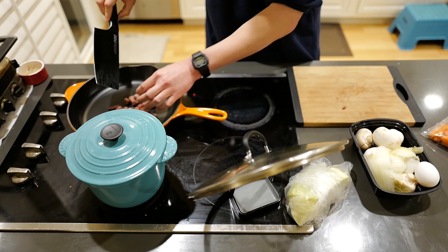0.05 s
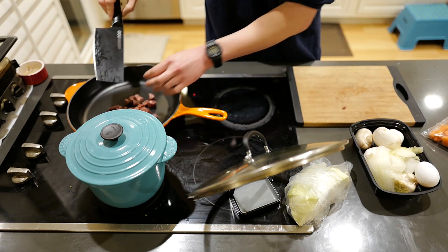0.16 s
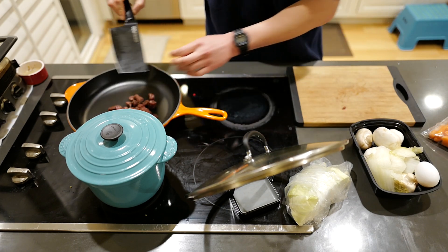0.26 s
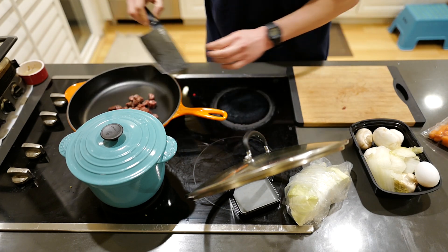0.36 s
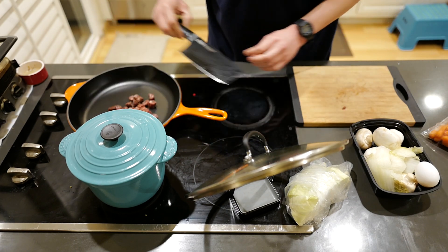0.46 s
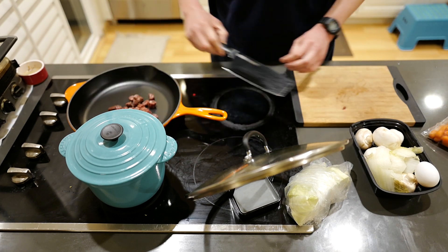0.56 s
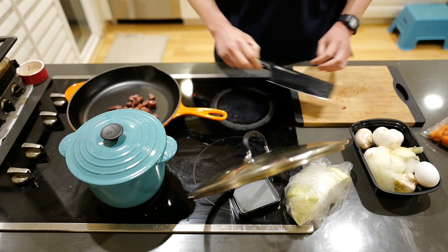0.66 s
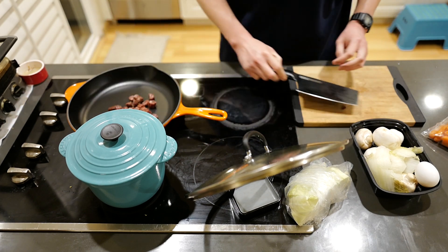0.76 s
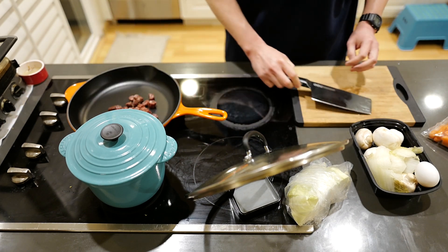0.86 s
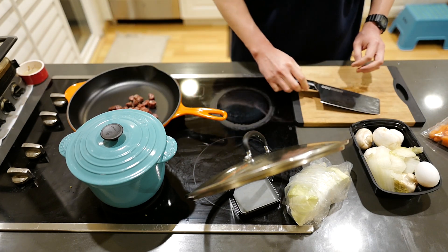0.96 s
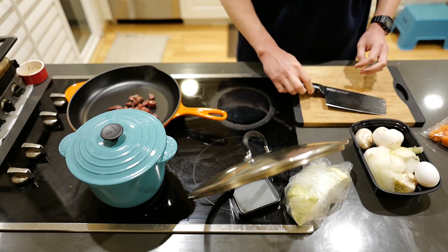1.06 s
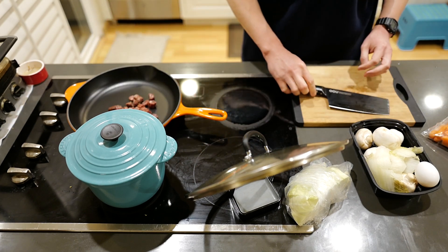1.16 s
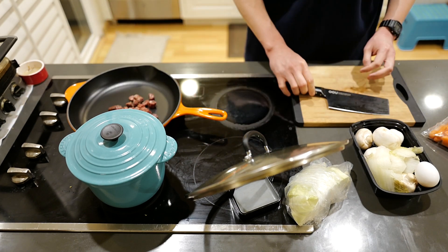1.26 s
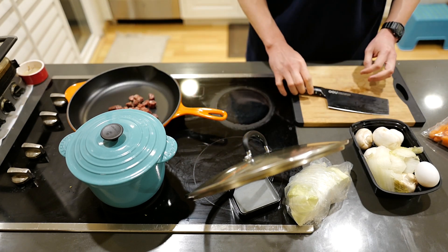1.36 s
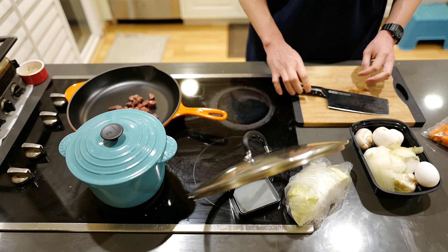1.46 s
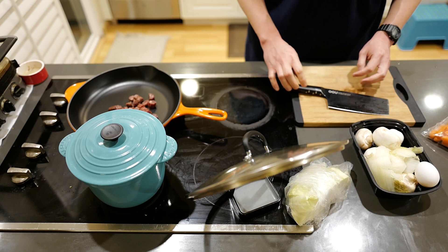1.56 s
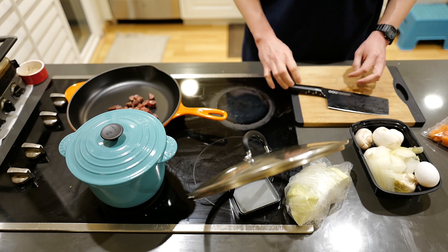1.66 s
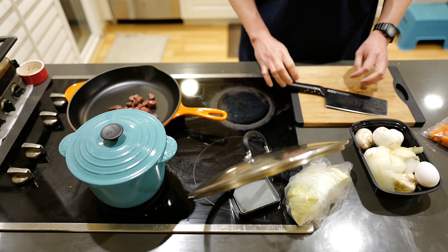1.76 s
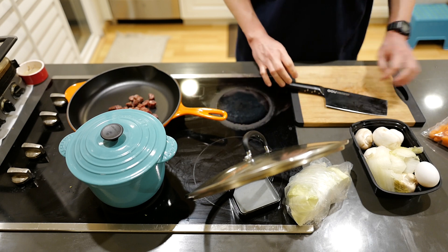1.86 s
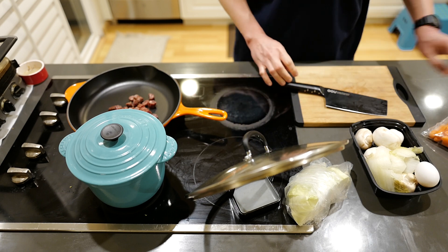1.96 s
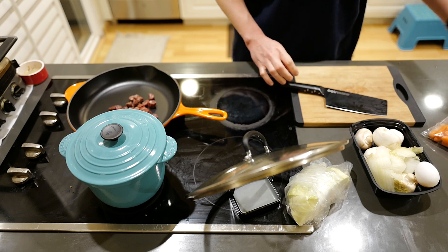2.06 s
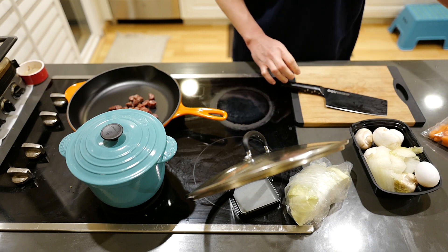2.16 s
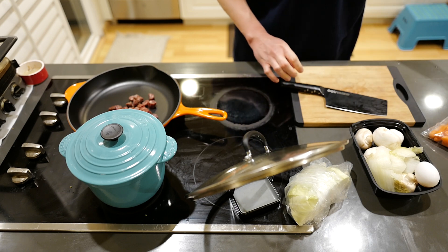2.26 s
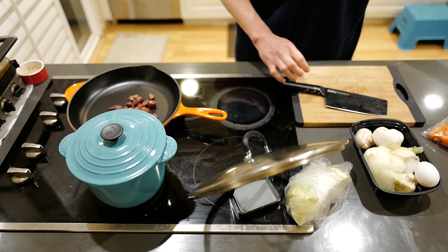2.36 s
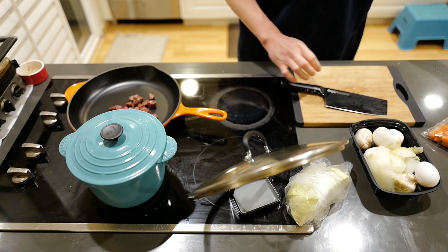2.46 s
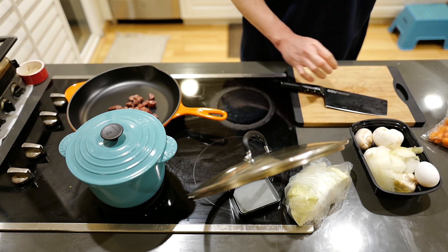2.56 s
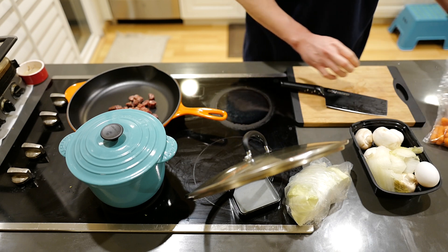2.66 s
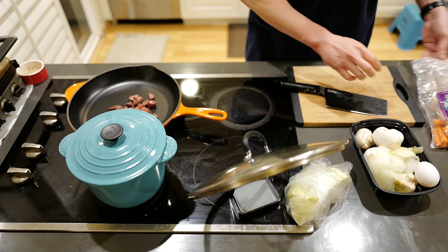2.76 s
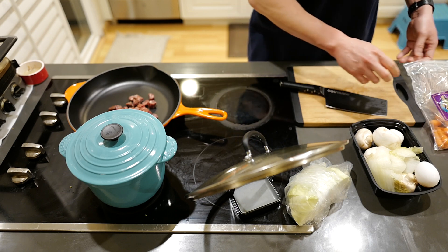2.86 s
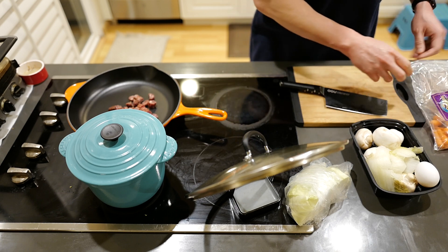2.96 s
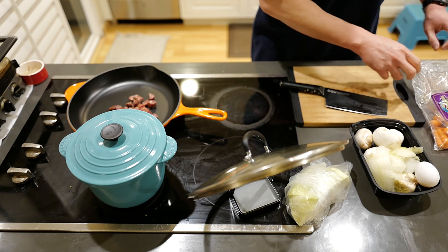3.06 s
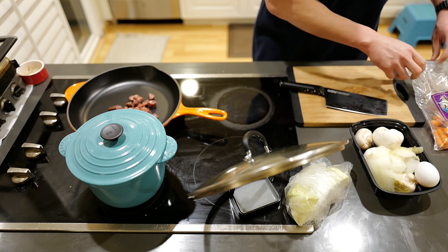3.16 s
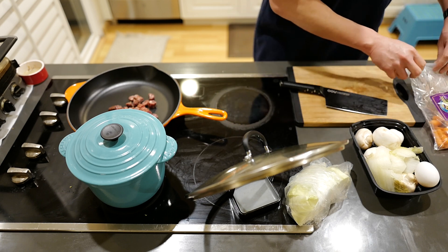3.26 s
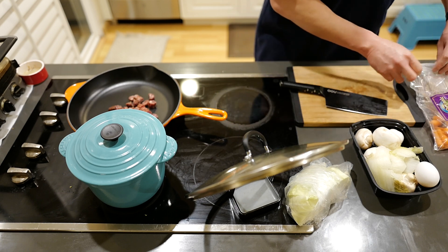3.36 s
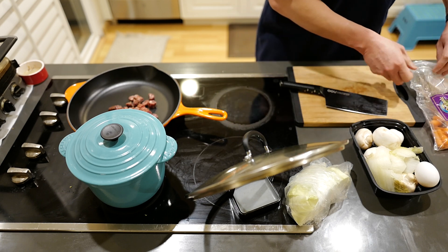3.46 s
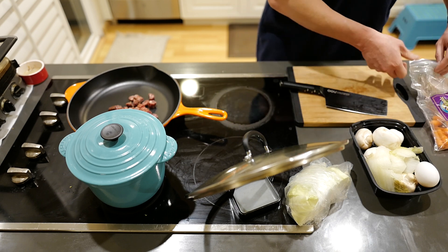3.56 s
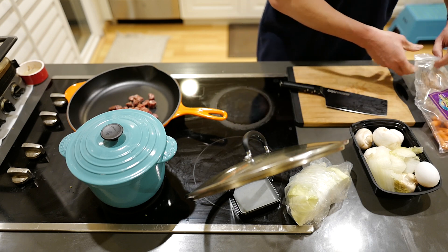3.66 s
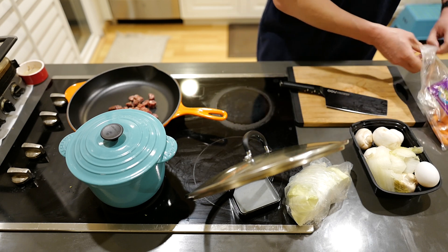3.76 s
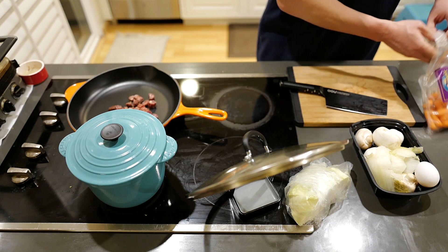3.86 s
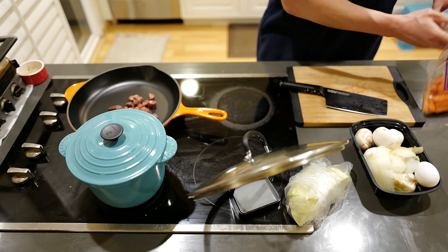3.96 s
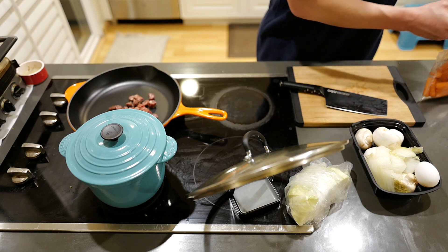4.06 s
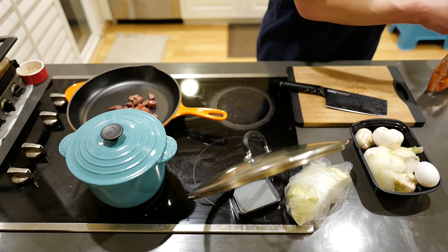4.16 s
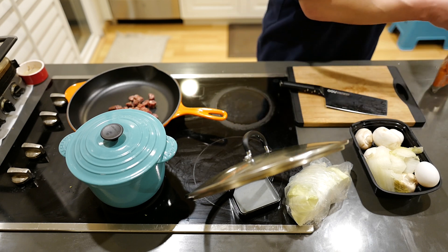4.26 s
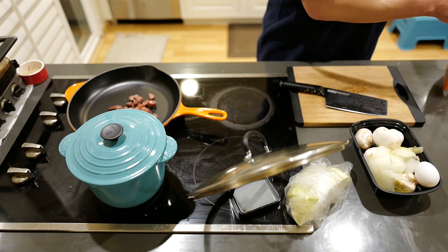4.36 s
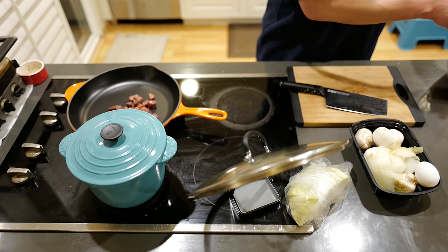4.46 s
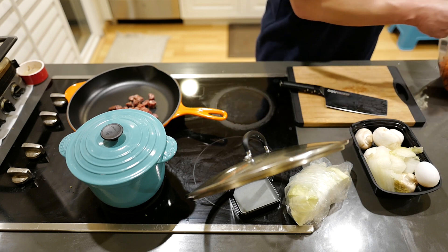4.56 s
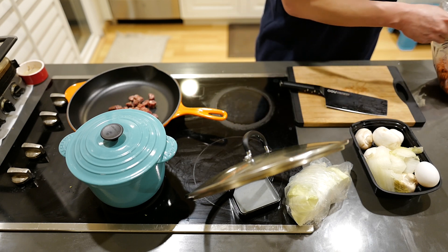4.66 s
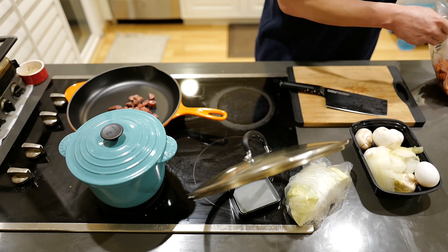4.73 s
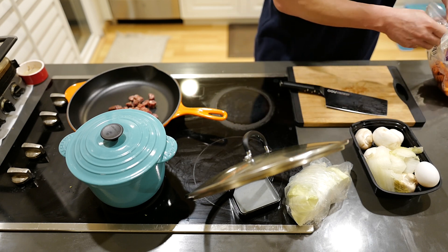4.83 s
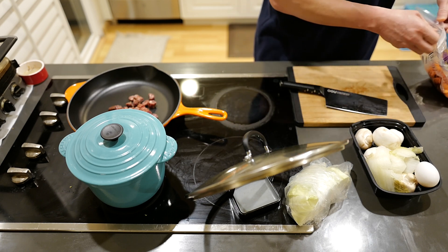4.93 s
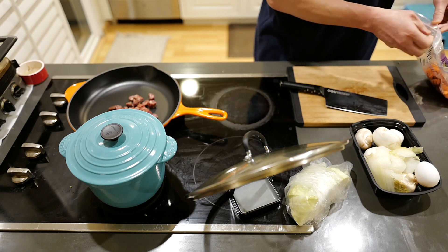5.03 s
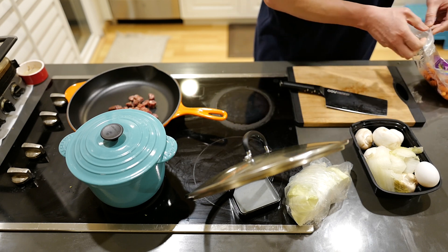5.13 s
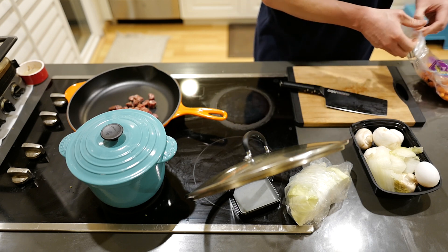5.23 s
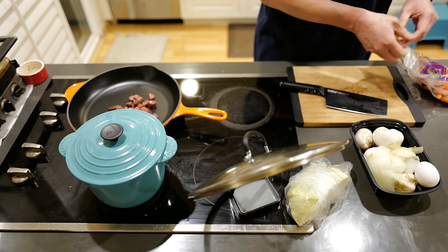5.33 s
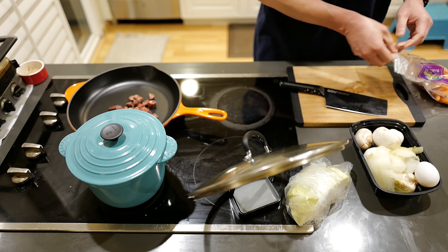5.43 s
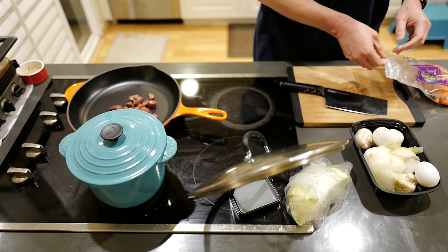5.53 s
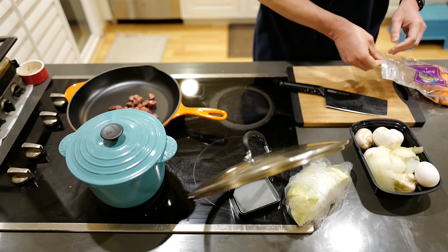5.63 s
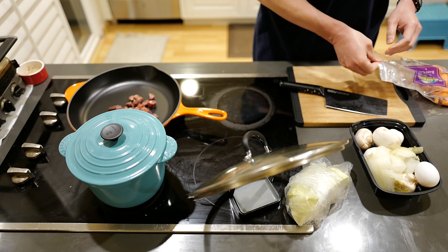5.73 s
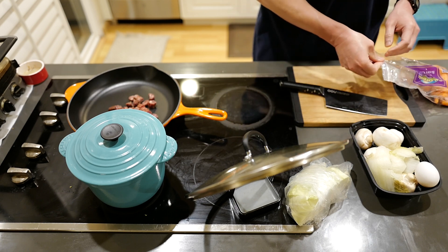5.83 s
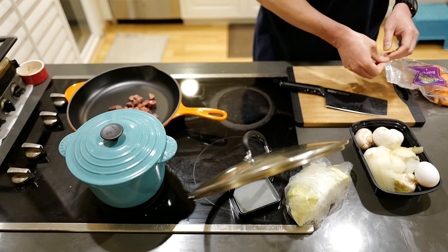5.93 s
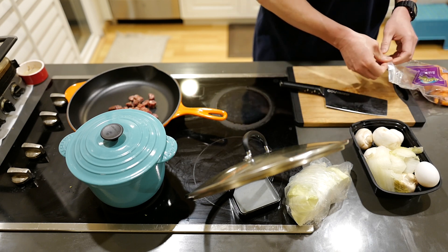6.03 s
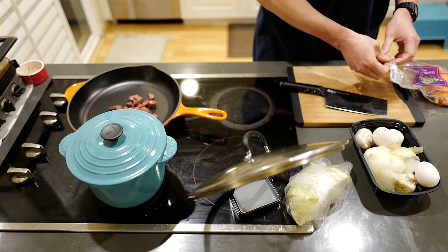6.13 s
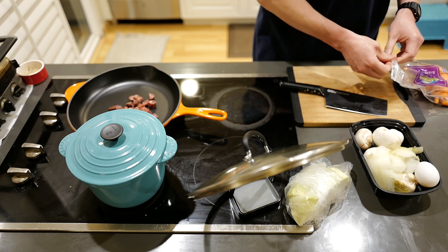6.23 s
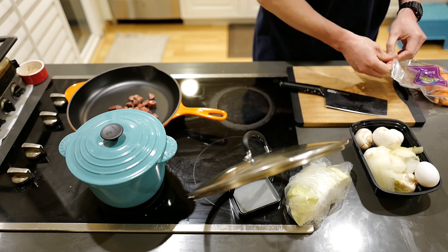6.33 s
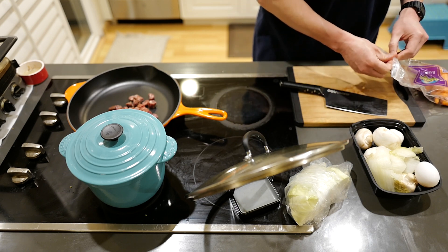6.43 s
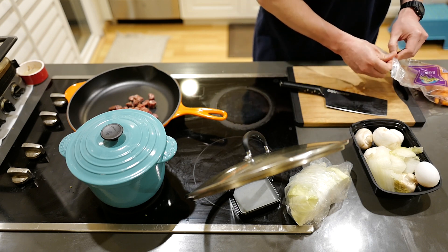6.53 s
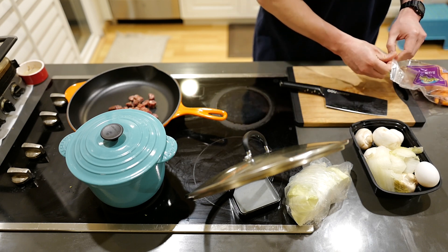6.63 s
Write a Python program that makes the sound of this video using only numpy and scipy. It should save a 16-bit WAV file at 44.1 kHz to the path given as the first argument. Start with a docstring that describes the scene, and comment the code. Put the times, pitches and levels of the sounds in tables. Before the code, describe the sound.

A soft brush of food and a tiny tick in a pan come first. A heavy cleaver lands on a cutting board, heel then flat, each clack leaving a brief steely ring, and is nudged along the wood. Then stiff plastic film snaps and rustles on the right while carrots bump dully. A soft ventilation hum runs throughout; the microphone is near, in a small lively kitchen.

```python
"""Cleaver, board and bag in a kitchen

A steel cleaver lightly touches an iron pan, then is set down on a wooden board: heel, then flat, then a nudge.
Its struck blade rings as decaying modes over knocks of coloured noise; the nudge is noise through resonances.
A plastic bag of carrots is handled: clicking film folds over a rustle of many small flips, with dull thumps.
A fan hums as wavering tones in air noise; tiled walls answer with decaying noise tails.
The microphone has a notch, a band limit and a mild gain control."""
import sys
import numpy as np
from scipy import signal
from scipy.fft import rfft, irfft, next_fast_len
from scipy.io import wavfile
from scipy.ndimage import uniform_filter1d, map_coordinates

SR = 44100
rng = np.random.default_rng(int(sys.argv[2]) if len(sys.argv) > 2 else 0)


def log_audio(samples):
    """Write samples as a 16-bit WAV file to the path given in sys.argv[1]."""
    # one column per channel
    frames = np.atleast_2d(samples).T
    # limit to full scale, then quantise
    limited = np.clip(frames, -1, 1)
    pcm = np.round(limited * 32767).astype(np.int16)
    wavfile.write(sys.argv[1], SR, pcm)


N = 295029  # length in samples


def amp(db):
    """Decibel law: level in dB to amplitude gain."""
    return 10 ** (np.asarray(db) / 20)


def unit(x):
    """Power normalisation: scaled to rms 1."""
    return x / np.sqrt(np.mean(x ** 2) + 1e-20)


def along(points, hz):
    """Logarithmic frequency scale: (f/Hz, value) points interpolated at hz."""
    f, value = np.transpose(points)
    return np.interp(np.log(hz + 1), np.log(f + 1), value)


def curves(rows):
    """Level envelopes: one value per sample for each dB column, -120 dB outside the table."""
    times, *columns = np.transpose(rows)
    return [np.interp(np.arange(N) / SR, times, column, -120, -120) for column in columns]


def wobble(rate):
    """Slow random modulation: a smooth curve through `rate` random knots a second."""
    knots = rng.standard_normal(int(N * rate / SR) + 4)
    return map_coordinates(knots, [np.arange(N) * rate / SR])


def filtered(x, response):
    """Linear filtering: the spectrum of x times a complex response of frequency."""
    m = next_fast_len(N + SR // 2)
    return irfft(rfft(x, m) * response(np.fft.rfftfreq(m, 1 / SR)), m)[..., :N]


def coloured(x, spectrum):
    """Minimum-phase filtering: causal colouring that keeps the power of white noise."""
    level_db = along(spectrum, np.fft.rfftfreq(2048, 1 / SR))
    cepstrum = irfft(np.log(amp(level_db) + 1e-6))
    cepstrum[1:1024] *= 2  # folding the cepstrum forward makes the filter causal
    cepstrum[1025:] = 0
    h = irfft(np.exp(rfft(cepstrum)))
    return signal.fftconvolve(x, h / np.linalg.norm(h))[:len(x)]


def spread(pair, alike):
    """Interchannel coherence: two unrelated signals mixed to left and right with the given likeness."""
    def weights(hz):
        turn = np.arccos(np.clip(along(alike, hz), -1, 1)) / 2
        return np.array([np.cos(turn), np.sin(turn)])
    mid, side = filtered(pair, weights)
    return np.array([mid + side, mid - side])


# fan and room air spectrum: f/Hz, relative level/dB per Hz
AIR_SPECTRUM = [(20, -39.5), (60, -38.5), (90, -37), (130, -23), (270, -18), (330, -19.5), (420, -20.5),
                (650, -28.5), (1150, -25.5), (1400, -30), (2000, -32.5), (2500, -35.5), (4700, -41),
                (5300, -37), (9800, -39.5), (16000, -47.5)]
# course of the air noise: t/s, level/dB
AIR_COURSE = [(0, -59), (.4, -56), (1.5, -58), (3.2, -57), (6.69, -57)]
# left-right likeness of the air noise: f/Hz, likeness (1 = identical)
AIR_LIKENESS = [(60, 0.62), (130, 0.84), (290, 1), (640, 0.27), (1410, 0.08), (3100, 0.12), (6820, 0.36),
                (15000, 0.73)]


def air_noise():
    """Broadband flow noise: stereo coloured noise whose level drifts slightly."""
    air = filtered(rng.standard_normal((2, N)), lambda hz: amp(along(AIR_SPECTRUM, hz)))
    level_db = curves(AIR_COURSE)[0] + 0.47 * wobble(16)
    return amp(level_db) * unit(spread(air, AIR_LIKENESS))


# tones of the turning fan: shaft order (multiple of the shaft rate), mean level/dB
FAN_ORDERS = [(10, -66), (11, -54), (12, -66), (13, -66), (37, -78), (40, -75)]
SHAFT_HZ = 29.68  # mean rate; it wavers slightly
# a thin whine at constant pitch: f/Hz, relative level/dB
THIN_WHINE = (1562, -78)


def fan():
    """Rotational tones: shaft orders and a thin whine, each wavering in strength, over air noise."""
    turns = np.cumsum(SHAFT_HZ * (1 + .002 * wobble(5.5))) / SR
    tones = 0
    for order, db in FAN_ORDERS:
        strength = amp(db + 3 + 2.2 * wobble(14))  # 3 dB from rms to peak
        tones = tones + strength * np.sin(2 * np.pi * (order * turns + rng.random()))
    whine_hz, whine_db = THIN_WHINE
    whine = amp(whine_db + 4 + 2.0 * wobble(2.7)) * np.sin(2 * np.pi * whine_hz * np.arange(N) / SR)
    return tones + whine + air_noise()


# reverberation time of the late field: f/Hz, t60/s
WALL_DECAY = [(200, 0.49), (1000, 0.49), (3000, 0.36), (8000, 0.26), (15000, 0.24)]
# left-right likeness of the reverberation: f/Hz, likeness
WALL_LIKENESS = [(100, 1), (600, 0.94), (3000, 0.7), (8000, .7), (15000, 0.24)]


def kitchen(x):
    """Diffuse reverberation: four noise tails with frequency-dependent decay take turns, 1/8 s of input each."""
    out = np.zeros((2, N))
    turn = np.arange(N) // (SR // 8) % 4
    for k in range(4):
        hz, t, z = signal.stft(rng.standard_normal((2, SR // 2)), SR, nperseg=128)
        late = amp(-60 * t / along(WALL_DECAY, hz)[:, None])
        early = amp(1.5 - 60 * t / 0.035)
        tail = signal.istft(z * (late + early), SR, nperseg=128)[1]
        tail /= np.linalg.norm(tail[0])
        out += signal.fftconvolve((x * (turn == k))[None], tail, axes=1)[:, :N]
    delayed = np.pad(out, ((0, 0), (60, 0)))[:, :N]  # 60 samples of travel
    return spread(delayed, WALL_LIKENESS)


# the blade touches the iron pan: t/s, relative level/dB
PAN_TOUCH = (0.295, -52.5)
# modes of the pan: f/Hz, relative level/dB, t60/s
PAN_MODES = [(1080, 4.5, 0.032), (2060, -7, .1), (2900, -11, .06), (5070, -5, 0.098), (6700, -6, .04)]
# soft rustle of moving hands: t/s, level/dB
HAND_RUSTLE = [(0, -54.5), (.08, -76), (.2, -75), (.28, -60), (.4, -80), (.8, -72.5), (.9, -78)]


def pan():
    """Modal decay and friction noise: a light tick on iron and a soft rustle of moving hands."""
    touch_s, touch_db = PAN_TOUCH
    t = np.maximum(np.arange(N) / SR - touch_s, 0)
    tick = sum(amp(touch_db + db - 60 * t / t60) * np.sin(2 * np.pi * hz * t) for hz, db, t60 in PAN_MODES)
    sweep = amp(curves(HAND_RUSTLE)[0] + wobble(30)) * rng.standard_normal(N)
    # f/Hz, relative level/dB per Hz
    colour = [(100, -27), (250, -1), (700, 4.5), (1200, -12.5), (2100, -11), (3500, -31.0), (8000, -49.0)]
    return tick + coloured(sweep, colour)


# bag snaps: t/s, level/dB, low part/dB and high part/dB against it, pitch of the fold f/Hz
BAG_SNAPS = [(2.1019, -29.5, -27, -27.5, 2840), (2.115, -29, -22, -15.5, 2800),
             (2.1571, -40, -13.5, -7, 2200), (2.1948, -31, -18, -30, 2400), (2.3943, -40.5, -8, -19, 2380),
             (2.4305, -33, -9.5, -14, 4440), (2.4989, -16, -12.5, -11, 5090),
             (2.6305, -26.5, -9.5, -12.5, 4240), (2.6419, -26, -12.5, -23, 2980),
             (2.6585, -16.5, -20, -23, 3010), (2.6647, -23, -14, -11.5, 2900),
             (2.6796, -19, -21, -5.5, 5740), (2.6902, -24, -9, -16.5, 4500),
             (2.8066, -27, -14, -15.5, 2400), (2.8649, -31, -3, -19, 2334), (2.9088, -27, -11.5, -25, 2310),
             (2.9774, -45.5, 5.5, -24, 1780), (3.2836, -33, -12, -22, 3040),
             (3.3177, -18, -16.5, -17, 2350), (3.369, -20, -13, -6, 1844), (3.482, -21.5, -17, -14, 1590),
             (3.5005, -27.5, -15, -8, 5800), (3.598, -34.5, 0.5, -41, 1740), (3.6828, -23, -18, -17, 4920),
             (3.7177, -22.5, -24, -18, 3600), (3.7409, -25, -9.5, -23, 1930),
             (3.7716, -16.5, -13, -12.5, 2360), (3.7859, -23, -24, -8, 1790),
             (3.8242, -19.5, -10.5, -8, 3900), (3.8496, -18, -29, -13.5, 3910),
             (3.8945, -27, -12, -9, 1800), (3.9307, -10.5, -12.5, -14.5, 2010),
             (3.9688, -17, -18, -11.5, 3080), (4.0232, -16, -17.5, -20, 2940), (4.092, -34, -25, -32, 1870),
             (4.1497, -16.5, -32, -15.5, 5030), (4.1778, -13.5, -19.5, -10.5, 2730),
             (4.2987, -21.5, -20, -12.5, 5800), (4.3311, -17.5, -23.5, -15, 4730),
             (4.3944, -17.5, -18, -9, 5270), (4.4395, -19, -31, -15.5, 3200),
             (4.4621, -22.5, -23, -9, 1860), (4.5104, -21.5, -18, -12.5, 2000),
             (4.558, -16.5, -19.5, -13.5, 3100), (4.591, -20.5, -9.5, -9, 2540),
             (4.6038, -14.5, -30, -17.5, 3170), (4.6713, -18.5, -18, -12, 2840),
             (4.7112, -26.5, -12, -10.5, 5390), (4.8188, -29.5, -6, -45, 1660),
             (4.8688, -21.5, -31, -11, 5620), (4.8776, -17, -24, -21, 3130), (4.9114, -20, -18, -15, 3840),
             (5.0982, -28, -17, -20.5, 2390), (5.157, -27, -24, -22, 3020), (5.2717, -27, -19, -16, 1800),
             (5.3172, -22, -17.5, -10.5, 5000), (5.3382, -23.5, -18, -9.5, 3950),
             (5.3528, -24, -16, -12, 4470), (5.3918, -22, -20, -16, 3520), (5.4145, -22, -22, -10, 5970),
             (5.5186, -23, -17, -16, 3800), (5.5303, -16, -18.5, -16, 3470), (5.6526, -32, -8.5, -44, 1860),
             (5.8575, -26.5, -17, -6, 1750), (5.994, -30, -8, -14.5, 3110),
             (6.0068, -28.5, -16, -6.5, 4530), (6.0502, -25.5, -13.5, -24.5, 1770),
             (6.0832, -29.5, -12, -24.5, 1750), (6.103, -27.5, -25, -12, 1680),
             (6.1623, -31.5, -17, -34, 3800), (6.2422, -29.5, -18, -14.5, 4660),
             (6.2739, -32, -16, -17.5, 4330), (6.312, -25, -16, -15.5, 1810),
             (6.4854, -39.5, -14, -24, 1990)]
# energy of a snap over its peak, for low, middle and high folds: level/dB
SNAP_ENERGY = [
    [16],
    [4],
    [14],
]
# ring of a fold against its noise, before scaling; its decay; its share in the room
POP_DB, POP_T60_S, POP_AROUND = -11, 0.015, 0.55


def film_snaps():
    """Snap-through buckling: folds flip with a click and a brief ring. Gives near sound and all-round sound."""
    near, around = np.zeros((3, N + SR)), np.zeros((3, N + SR))
    t = np.arange(400) / SR
    for s, db, low_db, high_db, hz in BAG_SNAPS:
        start = round(s * SR)
        burst = amp(-60 * t / np.array([[.012], [.006], [.004]])) * rng.standard_normal((3, len(t)))
        burst[:, 0] = 7.7  # the fold lets go at once
        pop = amp(POP_DB - 60 * t / POP_T60_S) * np.sin(2 * np.pi * hz * t)  # the panel beside the fold
        burst[1] += pop
        size = amp(db + np.array([[low_db], [0], [high_db]]) + SNAP_ENERGY)
        near[:, start:][:, :len(t)] += size * burst / np.linalg.norm(burst, axis=1, keepdims=True)
        around[1, start:][:len(t)] += size[1] * POP_AROUND * pop / np.linalg.norm(pop)
        around[:, start] += size[:, 0]  # over all directions the colour of a snap mostly evens out
    return near, around


# crackle left by a snap, under its energy, for low, middle and high folds: level/dB
SETTLE_LEVEL = [
    [-28.5],
    [-33],
    [-30],
]
# how fast that crackle dies: t60/s
SETTLE_DECAY = [
    [0.14],
    [0.19],
    [0.17],
]
RUSTLE_LOW_DB, RUSTLE_HIGH_DB = -3.5, -8.5  # low and high folds against the middle ones


def rustle(handling_db, around):
    """Crackling noise: countless small flips follow the handling and the settling after each snap."""
    t = np.arange(SR // 2) / SR
    decay = amp(np.array(SETTLE_LEVEL) - 60 * t / SETTLE_DECAY) ** 2
    settling = np.abs(signal.oaconvolve(around ** 2, decay, axes=1)[:, :N])
    worked = amp(handling_db + np.array([[RUSTLE_LOW_DB], [0], [RUSTLE_HIGH_DB]]))
    sizes = np.minimum(rng.exponential(size=N), 3)  # few large ones
    flips = (rng.random(N) < .012) * amp(5.5 * sizes + 3 * wobble(40))
    flips = signal.lfilter([1], [1, -.9], flips)
    flips /= np.sqrt(np.abs(uniform_filter1d(flips ** 2, size=2600)) + 1e-9)  # the hand sets the longer pace
    grains = np.array([unit(flips * rng.standard_normal(N)) for _ in range(3)])
    return np.sqrt(worked ** 2 + settling) * grains


# carrots drop in the bag: t/s, relative level/dB
CARROT_BUMPS = [(2.409, -51.5), (2.659, -46.5), (2.862, -44), (3.322, -58.5), (3.749, -46.5), (3.92, -44),
                (3.981, -52.5), (4.048, -48.5), (4.164, -46), (4.342, -59), (4.563, -41.5)]
BUMP_RISE_S, BUMP_T60_S = .015, 0.75
BUMP_UNDER_DB, ROLL_DB = -7.5, -14.5  # bumps against their table; steady rolling against the handling


def carrots(handling_db):
    """Damped impact noise: low coloured noise swells and dies at each bump, over steady rolling."""
    t = np.arange(SR // 2) / SR
    lumps = np.pad(amp(handling_db + ROLL_DB), (0, SR))
    for s, db in CARROT_BUMPS:
        bump = amp(db + BUMP_UNDER_DB - 60 * t / BUMP_T60_S) * (1 - np.exp(-t / BUMP_RISE_S))
        lumps[round(s * SR):][:len(t)] += bump
    lumps = lumps[:N] * amp(1.8 * wobble(30)) * rng.standard_normal(N)
    # f/Hz, relative level/dB per Hz
    return coloured(lumps, [(60, -74.0), (150, -4.5), (220, 5), (350, 0.0), (700, -21.0)])


# how hard the hands work the bag: t/s, level/dB
BAG_HANDLING = [(2.07, -96), (2.12, -60), (2.33, -94.5), (2.44, -54.5), (2.6, -60), (2.67, -43.5),
                (2.78, -52), (2.93, -67.5), (3.2, -93.5), (3.3, -48), (3.34, -48), (3.45, -76), (3.62, -60),
                (3.82, -42.5), (4.0, -41.5), (4.13, -48.5), (4.35, -47), (4.6, -43), (4.83, -58.5),
                (5.08, -61), (5.25, -75.5), (5.36, -53), (5.75, -70), (5.97, -77), (6.05, -63.5),
                (6.3, -69), (6.42, -70.5), (6.69, -72.5)]
# film colour of low, middle and high folds: f/Hz, relative level/dB per Hz
LOW_FOLDS = [(150, -63.5), (400, -10.5), (700, -6), (1000, -1), (1700, -1), (2400, -7), (4000, -33)]
MIDDLE_FOLDS = [(300, -65), (1000, -35.5), (1800, -1.5), (2600, -1), (4500, 0), (6500, -7), (9000, -39.5),
                (14000, -48)]
HIGH_FOLDS = [(1500, -44), (4000, -17), (6500, 1), (8000, -1.5), (11000, -4.5), (14000, -15.5),
              (16500, -24.5)]
FACING_DB = 4  # snaps are louder straight on


def bag():
    """Thin-film radiation: three fold bands are coloured and summed. Gives near sound and what the walls get."""
    handling_db, = curves(BAG_HANDLING)
    near, around = film_snaps()
    crackle = rustle(handling_db, around)
    thump = carrots(handling_db)

    def film(folds):
        bands = zip(folds[:, :N] + crackle, (LOW_FOLDS, MIDDLE_FOLDS, HIGH_FOLDS))
        return sum(coloured(x, colour) for x, colour in bands)

    to_walls = film(.5 * near + 0.5 * around) / 1.066 ** .5
    return film(amp(FACING_DB) * near) + thump, to_walls + thump


# blade modes: f/Hz
BLADE_MODES = [1579, 2204, 2540, 2838, 3037, 3309, 3766, 3815, 3945, 4467, 5239, 5697, 5832, 5952, 6510,
               6864, 7180, 7799, 8024, 8619, 8955, 9813, 10422, 10618, 10782, 11930, 12370, 12607, 13330,
               14520]
# ringing of each mode, same order: heel blow relative level/dB, heel t60/s, flat blow relative level/dB, flat t60/s
BLADE_RING = [(-31, .4, -36.5, .4), (-29, .4, -32, .5), (-29, .38, -33, .5), (-22.5, .39, -25, 0.46),
              (-24.5, 0.49, -27.5, .4), (-27.5, .5, -25.5, .44), (-18, 0.54, -30.5, .44),
              (-28.5, 0.35, -23, .33), (-23, .4, -32, 0.4), (-14, 0.42, -22.5, 0.53),
              (-40, .5, -25.5, 0.26), (-17.5, 0.22, -12, .24), (-23.5, 0.51, -31, 0.28),
              (-11, 0.35, -31.5, .28), (-25.5, .42, -30.5, 0.39), (-29, .42, -22, 0.24),
              (-26.5, .38, -20, 0.35), (-36.5, 0.37, -34, .31), (-25.5, 0.2, -24.5, .27),
              (-29, 0.36, -30, .28), (-20.5, 0.41, -27, 0.31), (-23, .33, -32.5, 0.28),
              (-31, .32, -34, .25), (-29, .27, -33, .25), (-26.5, .22, -41, .3), (-35.5, .25, -45, .2),
              (-34.5, .28, -42.5, .26), (-40.5, .3, -36, .22), (-37.5, .25, -39, .17), (-43, .22, -48, .15)]


def blade_ring(t, blade_db, flat):
    """Modal synthesis: a struck plate sums decaying modes whose phase and level drift."""
    hz = np.c_[BLADE_MODES]
    heel_db, heel_t60, flat_db, flat_t60 = np.transpose(BLADE_RING)[:, :, None]
    knots = rng.standard_normal((2, len(hz), 24))  # 40 knots a second
    drift = np.array([[np.interp(t * 40, np.arange(24), k) for k in part] for part in knots])
    phase = 2 * np.pi * (hz * t + rng.random(hz.shape)) + .55 * drift[0]  # the blade rocks on the wood
    level_db = flat_db - 60 * t / flat_t60 if flat else heel_db - 60 * t / heel_t60
    ring = amp(blade_db + level_db + 2.4 * drift[1]) * np.sin(phase) * (1 - np.exp(-t / .0015))
    return ring.sum(0)


# board knock, struck by heel and by flat: f/Hz, relative level/dB per Hz
HEEL_KNOCK = [(60, -60.5), (120, -36.5), (220, -9), (420, -28), (800, -26.5), (1420, -6.5), (2200, -3),
              (3000, -1.5), (5400, -10.5), (10000, -14), (15000, -23.5), (16500, -52)]
FLAT_KNOCK = [(60, -74.5), (120, -52), (250, -11), (500, -10), (1000, -2), (1700, 0), (2230, 1.5),
              (3300, -1), (5500, -6.5), (9000, -14.5), (13000, -19.5), (16500, -47.5)]
# board modes: f/Hz, heel blow relative level/dB, flat blow relative level/dB, t60/s
BOARD_MODES = [(230, -28, -33, .07), (620, -31, -33, .08), (980, -34, -14, .055), (1230, -34, -17, .07),
               (1420, -12, -22, .05), (2200, -11, -9, .06)]
CHATTER_DULL = 0.4  # the chatter loses its treble, 0-1


def board_knock(t, blade_db, board_db, flat, knock_t60, rattle_db):
    """Impact excitation: a noise burst and a longer chatter are coloured, and board modes ring with them."""
    picked = rng.random(len(t) // 2 + 1) < .03  # a crowd of weak modes behind the strong ones
    crowd = unit(irfft(picked * np.exp(2j * np.pi * rng.random(len(picked))), len(t)))
    chatter = amp(rattle_db - 60 * t / 0.46) * (0.69 * crowd + 0.24 * rng.standard_normal(len(t)))
    chatter = signal.lfilter([1 - CHATTER_DULL], [1, -CHATTER_DULL], chatter)
    blow = amp(board_db - 60 * t / knock_t60) * rng.standard_normal(len(t))
    knock = coloured(blow + amp(1) * chatter, FLAT_KNOCK if flat else HEEL_KNOCK)
    for hz, heel_db, flat_db, t60 in BOARD_MODES:
        mode_db = blade_db + (flat_db if flat else heel_db)
        knock += amp(mode_db - 60 * t / t60) * np.sin(2 * np.pi * hz * t)
    return knock


# blade rubs the board: t/s, relative level/dB
BLADE_SLIDE = [(1.74, -64.5), (1.77, -35.5), (1.80, -37), (1.84, -53.5), (1.87, -67)]
# the lying blade rings a little off its free modes: f/Hz, relative level/dB
LYING_MODES = [(2200, -70), (2570, -71), (3348, -72), (5255, -64), (5705, -65), (5850, -69), (6580, -66),
               (8065, -67), (9445, -67), (10900, -73)]


def blade_slide():
    """Friction-driven resonance: rubbing noise excites the modes of the blade lying on the wood."""
    rub = amp(curves(BLADE_SLIDE)[0]) * rng.standard_normal(N)

    def modes(f):
        width = 1j * f * 70  # each resonance is 70 Hz wide
        resonances = sum(amp(db) * width / (c * c - f * f + width) for c, db in LYING_MODES)
        return resonances + amp(-90) * (f > 1500)

    return amp(59) * filtered(rub, modes)


# blade meets board: t/s, blade relative level/dB, board relative level/dB, lands flat?, knock t60/s,
# chatter relative level/dB
CLEAVER_BLOWS = [(0.943, -25.5, -27.5, False, 0.063, -40), (0.949, -32.5, -11.5, True, 0.0081, -49),
                 (0.9542, -2, -4.5, False, 0.02, -18.5), (1.008, -30.5, -18.5, True, 0.056, -48),
                 (1.3352, -2, -10, True, 0.026, -19), (1.3448, -18.5, -7.5, True, .03, -32),
                 (1.403, -28, -19.5, True, 0.028, -43.5), (1.425, -42, -31.5, True, .03, -46)]


def cleaver():
    """Superposition: each blow rings the blade and knocks the board; the slide joins the knock."""
    ring, knock = np.zeros((2, N + SR))
    t = np.arange(SR // 2) / SR
    for s, blade_db, board_db, flat, knock_t60, rattle_db in CLEAVER_BLOWS:
        here = slice(round(s * SR), round(s * SR) + len(t))
        ring[here] += blade_ring(t, blade_db, flat)
        knock[here] += board_knock(t, blade_db, board_db, flat, knock_t60, rattle_db)
    return ring[:N], knock[:N] + blade_slide()


NEAR_LOW_HZ = 139.6  # the near sounds and their room are cut steeply below this


def scene():
    """Direct and reverberant field: near sources with their room, and the fan."""
    ring, knock = cleaver()
    film, around = bag()
    knock = knock + pan()
    steel = ring + knock + kitchen(amp(-0.5) * ring + amp(-2.0) * knock)
    film = (film + amp(5.5) * kitchen(around)) * amp([[-.7], [.7]])  # the bag is to the right
    return filtered(steel + film, lambda f: (1j * f / (NEAR_LOW_HZ + 1j * f)) ** 3) + fan()


# microphone notch: f/Hz, width/Hz, depth (0-1)
MICROPHONE_NOTCH = (500, 170, .93)
TOP_HZ = 16300  # band limit


def record(dry):
    """Transducer response and compression: bass cut, notch, gain falling with recent power, band limit."""
    notch_hz, width, depth = MICROPHONE_NOTCH
    dry = filtered(dry, lambda f: 1j * f / (40 + 1j * f))  # little deep bass gets in

    def notch(f):
        band = 1j * f * width
        return 1 - np.clip(depth, 0, 1) * band / (notch_hz ** 2 - f * f + band)

    heard = filtered(dry, notch)
    memory = .12 * SR  # the gain control averages power over 0.12 s
    loud = signal.lfilter([1], [1, -np.exp(-1 / memory)], np.mean(heard ** 2, 0)) / memory
    held = np.clip(heard * (1 + loud / amp(-33.5) ** 2) ** -.08, -.95, .95)
    return filtered(held, lambda hz: hz < TOP_HZ)


dry = scene()
out = record(dry)
log_audio(out)
```